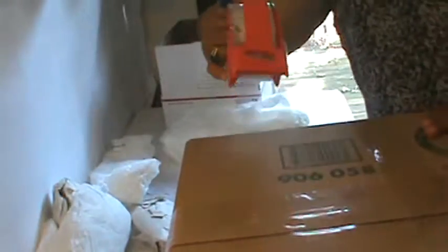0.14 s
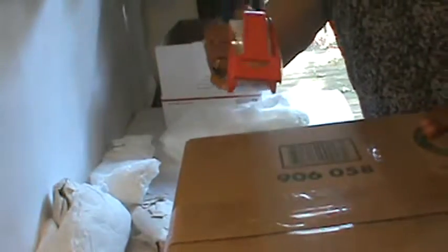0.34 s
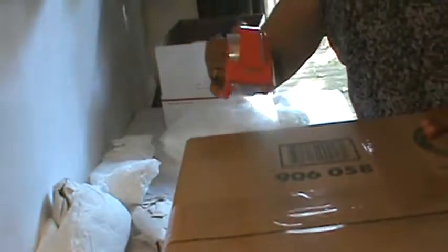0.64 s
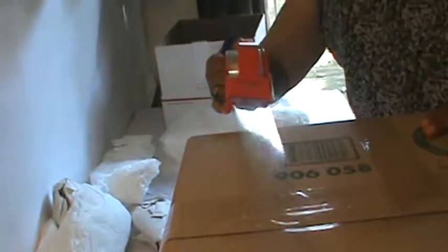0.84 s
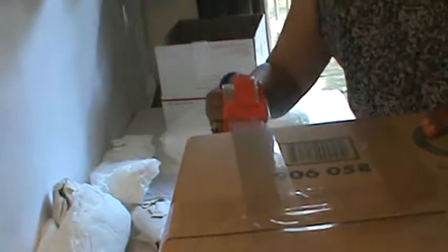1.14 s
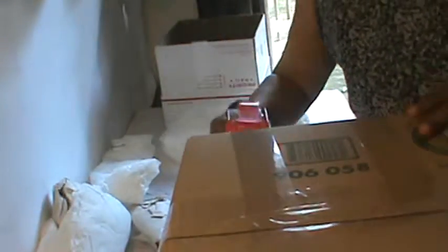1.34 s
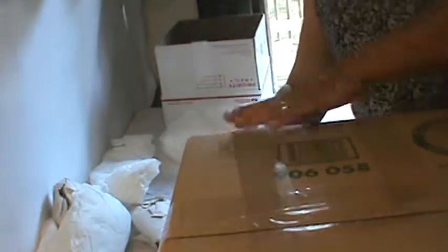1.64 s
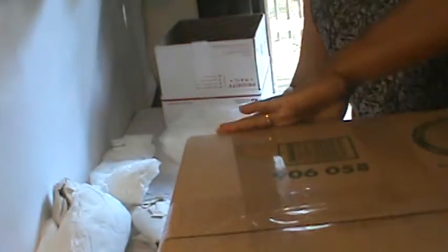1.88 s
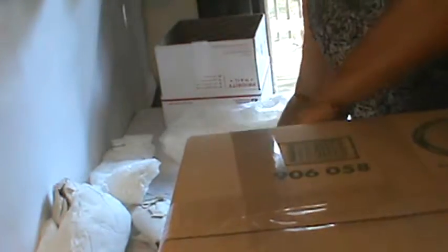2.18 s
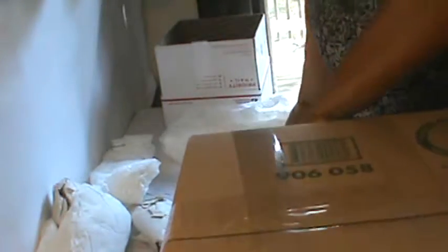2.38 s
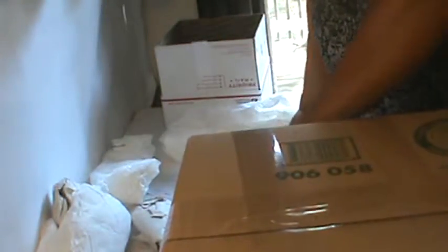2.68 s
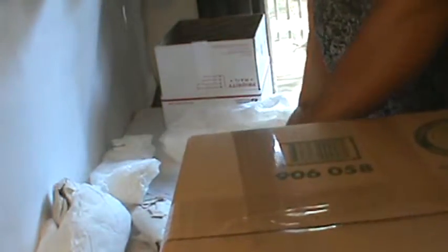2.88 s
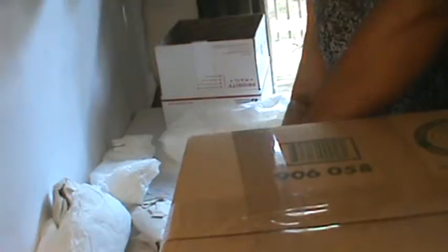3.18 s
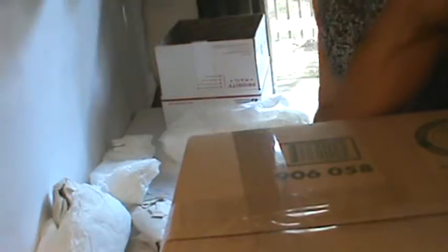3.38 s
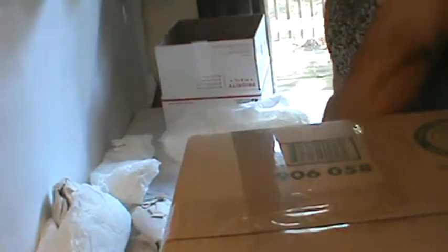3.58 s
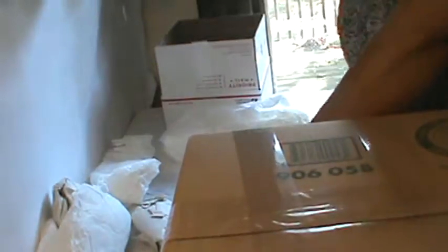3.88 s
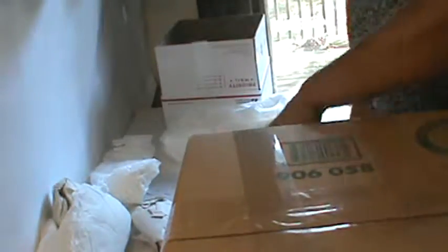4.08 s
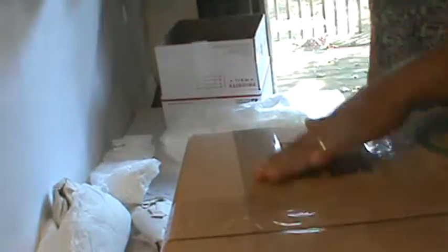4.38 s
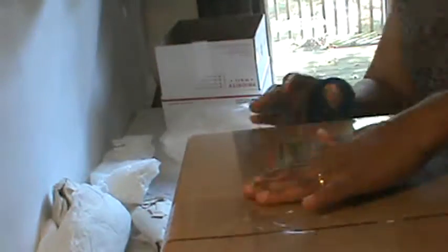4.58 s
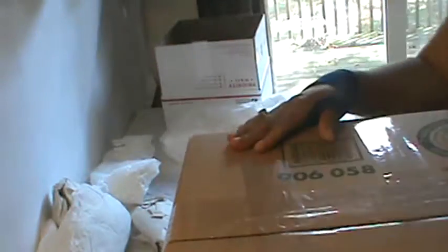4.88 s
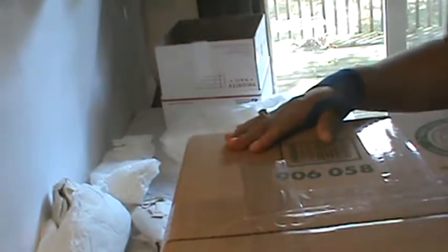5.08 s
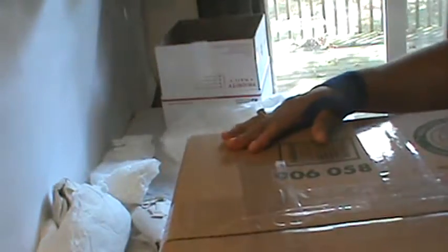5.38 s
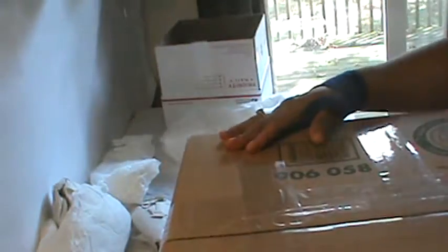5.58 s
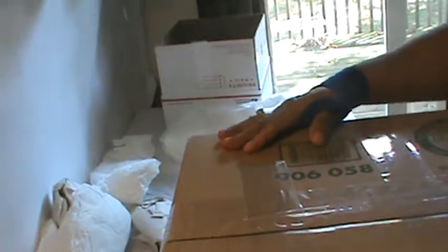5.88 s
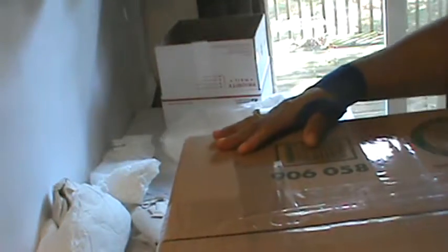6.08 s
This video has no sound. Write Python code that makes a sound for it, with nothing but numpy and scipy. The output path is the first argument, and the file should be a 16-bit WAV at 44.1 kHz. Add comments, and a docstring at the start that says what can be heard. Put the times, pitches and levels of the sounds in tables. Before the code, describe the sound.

Packing tape rasps off a hand-held dispenser in two harsh, crackling pulls, then hands pat and rub a hollow cardboard box indoors.

```python
"""A small furnished room: packing tape is drawn off a hand-held dispenser onto a hollow cardboard box.
The glue lets go in single snaps, each a click and a short noisy tear, that merge into a rasp.
Later, hands press and rub (grainy noise), knock (short pushes), and skin creaks in nearly even ticks.
Pushes ring the modes of the box; a dense fading tail makes the room, over a steady noise floor."""
import sys
import numpy as np
from scipy import signal
from scipy.fft import rfft, irfft
from scipy.io import wavfile

SR = 44100
rng = np.random.default_rng(int(sys.argv[2]) if len(sys.argv) > 2 else 0)


def dump(signal):
    """Clip the signal to [-1, 1] and save it as 16-bit WAV at the path in sys.argv[1]."""
    limited = np.clip(np.atleast_2d(signal).T, -1, 1)
    pcm = np.round(limited * 32767).astype(np.int16)
    wavfile.write(sys.argv[1], SR, pcm)


N = 275184

# Single releases of the glue from the roll, one (1.487 s) a fainter repeat close after a snap: start_s,
# level_db
GLUE_SNAPS = [(.0054, -12), (.0199, -10), (.0276, -10), (.0323, -14), (.037, -15), (.0442, -12),
              (.0574, -12), (.0648, -12), (.0714, -12), (.0788, -12), (.0912, -12), (.0972, -12),
              (.1094, -13), (.1163, -12), (.124, -12), (.1319, -13), (.1414, -13), (.1561, -12),
              (.1614, -12), (.1672, -13), (.1775, -12), (.1924, -13), (.203, -11), (.2078, -12),
              (.2221, -9), (.239, -10), (.2541, -10), (.3027, -10), (.3221, -11), (.3662, -9), (.3891, -11),
              (.4131, -10), (.4291, -12), (.4494, -10), (.4604, -11), (.4734, -11), (.4822, -11),
              (.4908, -10), (.5024, -12), (.5153, -11), (.5233, -11), (.5317, -12), (.5531, -9),
              (.5907, -9), (.6166, -11), (.6515, -10), (.8374, -12), (.9178, -11), (.9577, -9),
              (1.4807, -8), (1.487, -13), (1.5458, -8), (1.6294, -8), (1.6401, -15), (1.661, -9),
              (1.6829, -10), (1.6929, -14), (1.7045, -12), (1.7159, -14), (1.721, -14), (1.7365, -11),
              (1.7625, -11), (1.768, -12), (1.7793, -11), (1.7969, -11), (1.8056, -11), (1.8226, -12),
              (1.841, -12), (1.8646, -11), (1.8858, -12), (1.8981, -12), (1.9194, -11), (1.9463, -11),
              (1.9664, -11), (1.9927, -12), (2.0146, -13), (2.0209, -15), (2.0277, -14), (2.0462, -13),
              (2.0594, -15), (2.0736, -15), (2.0848, -16), (2.0942, -15), (2.1017, -15), (2.1088, -15),
              (2.1187, -15), (2.1322, -15), (2.144, -14), (2.1534, -15), (2.1717, -16), (2.1883, -16),
              (2.2044, -13)]
# How long a release lasts and how far its first click stands out: time_s, tear_ms, click_times_tear_peak
TEAR_SHAPE = [(0, 2.28, 0.32), (.7, 2.14, 0.58), (.84, 2.8, .7), (.92, 1.85, 0.72), (1.48, 1.5, 1.7),
              (1.63, 0.76, 0.88), (2.3, 0.33, 2)]
# The free tape's ringing, lower once it bends round the far edge: time_s, pitch_hz
FREE_TAPE_PITCH = [(0, 10660), (.7, 10700), (.83, 9870), (1.71, 10000), (1.74, 6300), (2.3, 6560)]
# Fine peeling between the snaps: time_s, level_db
FINE_PEELING = [(0, -26.5), (.1, -36), (.45, -37), (.55, -33), (.62, -34), (.7, -57), (1.48, -91.5),
                (1.482, -20.5), (1.5, -25.5), (1.506, -61), (1.545, -90), (1.547, -19.5), (1.562, -28.5),
                (1.568, -61), (1.62, -93), (1.635, -25.5), (1.75, -22), (1.85, -28), (2.05, -28),
                (2.15, -24), (2.21, -22), (2.25, -29), (2.3, -72.5)]
# How the tape hangs, stage by stage: start_s, to_slack_tape_db, to_box_db, to_taut_tape_db, taut_pitch_hz
TAPE_STAGES = [(0, -12, -61.5, -8, 2660), (.09, -12, -59, 0.5, 2860), (.19, -13, -54.5, 5, 2700),
               (.29, -4, -57, -2.5, 2500), (.315, -11, -55.5, 0, 1990), (.36, -2, -60, 2.5, 2900),
               (.385, -9, -51.5, 0, 3840), (.445, -7, -52.5, -3.5, 2490), (.51, -3.5, -54, 0, 3480),
               (.58, -2, -64, -8, 3130), (.8, -4.5, -48, 2, 3130), (.9, -7, -53, -6, 3060),
               (1.2, -7, -49, -6, 2300), (1.62, -8, -45, -1.5, 2500), (1.73, -7, -45.5, -5, 2860),
               (1.82, -11, -46, -11.5, 3490), (2.1, -11, -44.5, -4, 3590)]
# Tone of tape drawn in the air above the box: frequency_hz, level_db (per Hz)
TONE_ABOVE_BOX = [(60, -52), (90, -24.5), (118, 1.5), (170, -2.5), (250, -4.5), (330, -0.5), (420, -14.5),
                  (800, -2.5), (1100, -1.5), (1700, 1), (2400, 0.5), (3600, 0.5), (5300, 0.5), (8500, -2),
                  (10500, -1.5), (12500, -2), (15200, -9.5), (16500, -17)]
# Tone of tape drawn down behind the far edge: frequency_hz, level_db (per Hz)
TONE_BEHIND_EDGE = [(110, -33.5), (172, 4.5), (215, -15), (300, -7.5), (427, 8), (472, -2.5), (577, -1.5),
                    (730, -14), (1250, 1), (2240, -1.5), (10100, 0), (15200, -11.5), (16500, -31)]
# Resonances of the slack tape, each passed twice: frequency_hz, width_hz (one pass), level_db
SLACK_MODES = [(601, 248, 6), (874, 222, 7.5)]
# Panel and air modes of the box: frequency_hz, level_db, fade_by_60_db_s
BOX_MODES = [(79, -18.5, 0.065), (110.6, -13, 0.28), (171, 5, 0.084), (242.6, 1.5, 0.087),
             (273, 2.5, 0.026), (350.3, -8, 0.15), (428, 4.5, 0.041), (515, 0.5, 0.049),
             (770, -10.5, 0.075), (990, -6, 0.017)]
# Soft noise of hands brushing and pressing the box, and the dying tail of the pulled tape at 2.29 s:
# start_s, rise_s, hold_s, hiss_db, scrape_db, rumble_db
SOFT_SWELLS = [(1.279, 0.0041, 0.046, -57.5, -59.5, -64), (2.294, 0.03, 0.052, -51.5, -68, -84),
               (2.368, 0.025, 4.2, -74, -70.5, -67), (2.407, 0.033, 0.042, -63, -67, -71),
               (2.622, 0.019, 0.016, -85.5, -74.5, -91.5), (2.823, 0.017, 0.0079, -67, -81, -62),
               (2.935, 0.06, .03, -83, -63.5, -61), (3.035, 0.00099, 0.016, -42, -56, -51),
               (3.107, 0.0025, 0.041, -36, -39, -51), (3.111, 0.035, 0.0063, -24.5, -34.5, -50),
               (3.26, 0.084, 0.28, -55.5, -71.5, -70), (3.502, 0.1, 0.051, -55.5, -55, -56),
               (3.63, 0.058, 0.027, -49, -55, -65), (3.971, 0.0062, 0.0022, -48, -40.5, -31),
               (4.119, 0.017, 0.0045, -46.5, -39, -36), (4.665, 0.0054, 0.067, -62, -52.5, -49),
               (4.775, 0.018, 0.12, -55, -49, -65), (5.578, .03, 0.23, -60, -62, -60),
               (4.401, 0.0018, 0.0026, -56, -48, -32), (4.402, 0.0032, 0.066, -43, -58, -87)]
# Both hands smoothing the tape over the top: time_s, hiss_db
TOP_SMOOTHING = [(4.5, -59), (4.572, -58.5), (4.652, -39), (4.69, -41.5), (4.77, -36), (4.785, -24),
                 (4.838, -21), (4.92, -19), (4.976, -31), (5.034, -31), (5.082, -42), (5.38, -51),
                 (5.43, -42.5), (5.49, -42), (5.624, -28), (5.754, -24.5), (5.88, -34), (5.962, -28),
                 (6.068, -35.5), (6.2, -35.5), (6.22, -40), (6.24, -30)]
# Tone of the hiss, as of skin on film, on the far side panel: frequency_hz, level_db (per Hz)
SIDE_HISS_TONE = [(1760, -65), (3000, -4.5), (3390, -8), (4840, -6), (6530, 1.5), (7580, -5), (9530, 2.5),
                  (15100, -13.5), (16200, -26), (16500, -46)]
# Tone of skin hissing on film, on the top: frequency_hz, level_db (per Hz)
TOP_HISS_TONE = [(1760, -29), (3000, -13.5), (3930, -12), (4700, -11), (7160, -3), (8810, -4.5),
                 (11600, -1.5), (15700, -14), (16200, -17), (16500, -29)]
# Tone of the scrape, as of skin on cardboard, on the far side panel: frequency_hz, level_db (per Hz)
SIDE_SCRAPE_TONE = [(290, -24), (500, -6.5), (736, 14.5), (996, -3), (1120, 2.5), (1880, -1), (2300, 4.5),
                    (3320, -4.5), (4500, -4), (5850, -27), (9900, -120)]
# Tone of skin scraping cardboard, on the top: frequency_hz, level_db (per Hz)
TOP_SCRAPE_TONE = [(290, -77.5), (450, -5), (750, -3), (1150, -4.5), (1760, -1), (2300, -3), (2900, -6.5),
                   (3740, -5.5), (4500, -13), (5850, -84), (9900, -120)]
# Resonances of the rubbed side panel, each passed twice: frequency_hz, width_hz (one pass), level_db
SIDE_PANEL_MODES = [(510, 130, 8), (1030, 170, 11), (1385, 120, 11), (1870, 200, 10), (3400, 400, 5)]
# Tone of the box shaken by rubbing: frequency_hz, level_db (per Hz)
RUMBLE_TONE = [(15, -31), (25, -12), (59, 1.5), (108, -2.5), (165, 7), (281, -3.5), (325, 2.5), (382, -4),
               (436, -1), (600, -9), (780, -34), (1320, -120)]
# Lone crackles of the laid tape: start_s, level_db, pitch_hz
LONE_CRACKLES = [(1.281, -38, 6500), (1.3149, -44, 5000), (2.8404, -48, 9600), (2.862, -57, 5000),
                 (3.035, -31, 6500), (3.1064, -33, 6500), (3.3842, -34, 6500), (3.54, -39, 5000),
                 (3.6494, -32, 6500), (3.6676, -37, 6500), (3.9784, -31, 6960), (4.1355, -29.5, 6500),
                 (4.175, -44, 9000), (4.21, -49, 2800), (4.2607, -41, 9000), (4.31, -48, 5000),
                 (4.4019, -35, 6500), (4.656, -30, 3000), (4.678, -26, 2000), (4.7244, -14, 4230),
                 (4.7424, -16, 3200), (4.78, -24, 3500), (4.8017, -14, 4000)]
# Skin creaking in short, nearly even runs of ticks: start_s, end_s, rate_per_s, level_db, pitch_hz
SKIN_TICK_RUNS = [(2.4365, 2.505, 92.5, -39, 5500), (2.9607, 3.02, 75.5, -41, 5500)]
# Tone of crackles and creak ticks: frequency_hz, level_db (per Hz)
TICK_TONE = [(400, -39), (1200, -12), (3000, -10), (4000, -5), (9000, -4), (15500, -15.5), (16500, -19)]
# Hands landing on the box: start_s, level_db, favoured_pitch_hz
HAND_KNOCKS = [(1.318, -67, 293), (2.78, -53.5, 197), (2.838, -47, 299), (2.98, -52, 168),
               (3.038, -46, 406), (3.128, -36, 520), (3.151, -36, 1010), (3.158, -36, 171),
               (3.166, -33, 320), (3.976, -19.5, 330), (3.978, -21.5, 784), (3.993, -26, 223),
               (4.108, -35, 370), (4.137, -52, 500), (4.216, -40, 295), (4.402, -25, 146),
               (4.424, -25, 74.5), (4.45, -38, 70), (4.537, -48, 250), (4.679, -40.5, 205),
               (4.696, -35, 109), (4.716, -36, 109), (4.76, -35, 300), (4.799, -43, 400),
               (4.827, -37.5, 425), (5.161, -45.5, 346), (5.598, -38.5, 440), (5.69, -39, 400),
               (5.73, -40, 302), (5.755, -35.5, 410), (5.781, -44, 191), (6.05, -45, 171)]
# Skin sticking and slipping on the tape: start_s, end_s, first_rate_per_s, last_rate_per_s, tick_db, box_db
SKIN_CREAKS = [(2.636, 2.68, 168, 172, -56.5, -60), (3.5583, 3.643, 160, 182, -38.5, -50)]
# Tone of the steady floor: frequency_hz, level_db (per Hz)
FLOOR_TONE = [(15, -40.5), (25, -17), (85, 1.5), (146, -3.5), (252, -10), (927, -15), (1430, -22.5),
              (1550, -22), (14000, -27), (15200, -24), (16500, -18.5)]
# Basic stereo spread: frequency_hz, side_minus_mid_db
STEREO_SPREAD = [(60, -29.5), (180, -16.5), (550, -9), (1650, -10.5), (4970, -8.5), (15000, -6.5)]
# Stereo balance of everything sent through the room: frequency_hz, left_minus_right_db
ROOM_BALANCE = [(60, -2), (240, 1), (950, 1.5), (3770, 1), (15000, -1.5)]
# Room level against direct sound, changing as the source moves: time_s, room_level_db
ROOM_LEVEL = [(0, -3.5), (.7, -1.5), (.8, 5.5), (1.1, -3.5), (1.3, -0.5), (2.3, 1.5), (2.4, -7), (4.4, 1.5),
              (4.6, -7)]

BEHIND_EDGE_S, ONTO_TOP_S = 1.2, 4.4  # tape goes behind the edge; hands move from side panel to top
RING_SPREAD_OCTAVES = .04  # from one release to the next
SNAP_THIN_HZ = 1740  # a snap is too small to send out much below this
SLACK_LAG_S = .005  # the slack tape answers a moment after the snap
TAUT_WIDTH_HZ = 250  # first mode, one pass
TAUT_OVERTONE, TAUT_OVERTONE_DB = 1.938, -2  # second mode: times the first, and level
RISE_DB, FALL_DB_PER_S = 39, 284  # a swell climbs this far, then falls this fast
SMOOTH_MID_DB, SCRAPE_DB, RUMBLE_DB = -30, -45, -52  # middling hiss; scrape and rumble at that point
SCRAPE_FOLLOWS, RUMBLE_FOLLOWS = 0.69, 0.53  # share of the hiss's swing in dB
SIDE_PAN_DB, TOP_PAN_DB = .7, -2  # hiss, left minus right
FLOOR_DB = -61.5
ROOM_T60_S, BASS_T60_S, ROOM_GAP_S = 0.2, 0.32, 0.0017  # fade by 60 dB; moment the reflections build up
CUTOFF_HZ = 15850


def from_db(db):
    """Turn decibels into gain."""
    return 10 ** (np.asarray(db) / 20)


def rms_one(x):
    """Scale to an average strength (rms) of 1."""
    return x / np.sqrt(np.mean(x ** 2) + 1e-20)


def in_time(rows):
    """Join table columns by straight lines, one value a sample."""
    s, *columns = np.transpose(rows)
    return [np.interp(np.arange(N) / SR, s, column) for column in columns]


def add(track, s, sound):
    """Mix a short sound in at time s."""
    i = round(s * SR)
    track[i:i + len(sound)] += sound[:N - i]


def colour(x, spectrum):
    """Shape the tone with a filter that answers as early as it can (minimum phase)."""
    hz, db = np.transpose(spectrum)
    grid_hz = np.maximum(np.arange(4097) * SR / 8192, 1)
    log_gain = np.interp(np.log(grid_hz), np.log(hz), db) * np.log(10) / 20
    # folding the cepstrum onto positive times gives the minimum phase
    cepstrum = irfft(log_gain)
    cepstrum[1:4096] *= 2
    cepstrum[4097:] = 0
    response = irfft(np.exp(rfft(cepstrum)))
    return signal.fftconvolve(x, response)[:N]


def resonate(x, hz, width_hz):
    """Ring at one pitch (two-pole resonance), with gain 1 at its peak."""
    r = np.exp(-np.pi * width_hz / SR)
    top = np.array([1, 0, -1]) * (1 - r * r) / 2
    return signal.lfilter(top, [1, -2 * r * np.cos(2 * np.pi * hz / SR), r * r], x + 1e-18)


def resonate_twice(x, hz, width_hz):
    """Pass through the same resonance twice, for steeper sides."""
    return resonate(resonate(x, hz, width_hz), hz, width_hz)


def grains(per_s, spread_db):
    """Dense random micro-slips of uneven size; rms 1."""
    sizes = from_db(spread_db * np.minimum(rng.exponential(1, N), 5)) * rng.choice([-1, 1], N)
    return rms_one(sizes * (rng.random(N) < per_s / SR))


def wide_noise(spectrum, per_s, spread_db):
    """Grainy noise: a mid part of rms 1 plus an unrelated side part, opposite in left and right."""
    mid, side = (rms_one(colour(grains(per_s, spread_db), spectrum)) for _ in range(2))
    return mid + colour(side, STEREO_SPREAD) * [[1], [-1]]


def snaps(events, ring_db, half_db, width_hz):
    """A release is a sharp click and a moment of tearing; the tape rings at a pitch and an octave below."""
    out, t = np.zeros(N), np.arange(400) / SR
    bursts = rng.standard_normal((len(events), 400))
    for (s, level_db, hz, tear_ms, click), burst in zip(events, bursts):
        shape = np.exp(-(1000 * t / tear_ms) ** 1.5)
        # a tear holds most pitches: partly flatten its spectrum inside its outline
        for _ in range(2):
            phase = np.angle(rfft(rms_one(burst) * shape))
            burst = irfft(np.exp(1j * phase)) * np.sqrt(shape)
        burst[0] = click * np.max(np.abs(burst))
        burst = burst + from_db(ring_db) * resonate(burst, hz, width_hz)
        # this also answers the ringing just added
        burst = burst + from_db(half_db) * resonate(burst, hz / 2, width_hz / 2)
        start_strength = np.sqrt(np.mean(burst[:40] ** 2))
        add(out, s, from_db(level_db) * burst / start_strength)
    return out


def taut_tape(force, stage, pitches):
    """The stretched span rings in two modes whose pitch shifts whenever the span changes."""
    out = 0
    for k, hz in enumerate(pitches):
        stage_force = force * (stage == k)
        for times, level_db in ((1, 0), (TAUT_OVERTONE, TAUT_OVERTONE_DB)):
            out = out + from_db(level_db) * resonate_twice(stage_force, times * hz, times * TAUT_WIDTH_HZ)
    return out


def slack_tape(force):
    """The loose tape answers a little late, in broad low resonances of alternating sign."""
    shake = np.roll(force, round(SLACK_LAG_S * SR))
    out = 0
    for k, (hz, width_hz, level_db) in enumerate(SLACK_MODES):
        out = out + (-1) ** k * from_db(level_db) * resonate_twice(shake, hz, width_hz)
    return out


def tape():
    """Snaps and fine peeling shake the slack and taut tape; also returns the force passed to the box."""
    peel_db, = in_time(FINE_PEELING)
    tear_ms, click = in_time(TEAR_SHAPE)
    ring_hz, = in_time(FREE_TAPE_PITCH)
    starts, *shares, taut_hz = np.transpose(TAPE_STAGES)
    stage = np.clip(np.searchsorted(starts, np.arange(N) / SR) - 1, 0, None)
    slack_db, box_db, taut_db = (share[stage] for share in shares)

    detune = 2 ** (RING_SPREAD_OCTAVES * rng.standard_normal(len(GLUE_SNAPS)))
    events = []
    for (s, level_db), factor in zip(GLUE_SNAPS, detune):
        i = round(s * SR)
        events.append((s, level_db, min(factor * ring_hz[i], .4 * SR), tear_ms[i], click[i]))
    snap = snaps(events, ring_db=-0.5, half_db=-7.5, width_hz=920)
    peel = from_db(peel_db) * grains(3500, spread_db=3.5)
    force = snap + peel
    thin = signal.lfilter(*signal.butter(1, SNAP_THIN_HZ, "high", fs=SR), snap) + peel

    behind = np.arange(N) > BEHIND_EDGE_S * SR
    air = from_db(1.5) * colour(thin * ~behind, TONE_ABOVE_BOX)
    air = air + from_db(1.75) * colour(thin * behind, TONE_BEHIND_EDGE)
    slack = slack_tape(force * from_db(slack_db))
    taut = taut_tape(force * from_db(taut_db), stage, taut_hz)
    return air + slack + taut, force * from_db(box_db)


def box(force):
    """The hollow box rings in its panel and air modes, with little left below about 70 Hz."""
    out = 0
    for k, (hz, level_db, t60_s) in enumerate(BOX_MODES):
        r, w = from_db(-60 / (t60_s * SR)), 2 * np.pi * hz / SR
        ringing = signal.lfilter([0, np.sin(w)], [1, -2 * r * np.cos(w), r * r], force + 1e-18)
        out = out + (-1) ** k * from_db(level_db) * ringing
    return signal.sosfilt(signal.butter(2, 70, "high", fs=SR, output="sos"), out)


def steady_floor():
    """An even bed of very dense grainy noise lies under everything."""
    return from_db(FLOOR_DB) * wide_noise(FLOOR_TONE, 22000, spread_db=-2.5)


def soft_noise_gains():
    """Hiss, scrape and rumble gains: swells rise, hold and die away; the smoothing drives all three."""
    t = np.arange(N) / SR
    hiss_db, = in_time(TOP_SMOOTHING)
    swing_db = hiss_db - SMOOTH_MID_DB
    scrape_db = SCRAPE_DB + SCRAPE_FOLLOWS * swing_db
    rumble_db = RUMBLE_DB + RUMBLE_FOLLOWS * swing_db
    gains = from_db([hiss_db, scrape_db, rumble_db]) * (t > TOP_SMOOTHING[0][0])
    for s, rise, hold, *levels_db in SOFT_SWELLS:
        swell_db = RISE_DB * np.minimum((t - s) / rise - 1, 0)
        fall_db = FALL_DB_PER_S * (s + rise + hold - t)
        shape_db = np.maximum(np.minimum(swell_db, fall_db), -200)
        gains = gains + from_db(levels_db)[:, None] * (from_db(shape_db) * (t >= s))
    return gains


def rubbing_and_tape_tail():
    """Skin on film hisses, on cardboard scrapes, and shakes the box; the pulled tape's tail is noise too."""
    hiss_gain, scrape_gain, rumble_gain = soft_noise_gains()
    on_top = np.arange(N) > ONTO_TOP_S * SR
    pan_db = np.where(on_top, TOP_PAN_DB, SIDE_PAN_DB)
    pan = from_db(pan_db / 2 * [[1], [-1]])

    top_hiss = wide_noise(TOP_HISS_TONE, 14000, spread_db=2.0)
    side_hiss = wide_noise(SIDE_HISS_TONE, 9000, spread_db=2.5)
    hiss = np.where(on_top, top_hiss, side_hiss)

    side_scrape = wide_noise(SIDE_SCRAPE_TONE, 2500, spread_db=1.0)
    panel = sum(from_db(db) * resonate_twice(side_scrape, hz, width) for hz, width, db in SIDE_PANEL_MODES)
    side_scrape = rms_one(side_scrape + panel)
    top_scrape = wide_noise(TOP_SCRAPE_TONE, 4000, spread_db=0.5)
    scrape = np.where(on_top, top_scrape, side_scrape)

    rumble = wide_noise(RUMBLE_TONE, 1500, spread_db=0.5)
    return hiss_gain * pan * hiss + scrape_gain * scrape + rumble_gain * rumble


def runs(rows, uneven, spread_db):
    """Spell runs out as single (s, dB, Hz) events, a little uneven in time and size."""
    out = []
    for start, end, per_s, level_db, hz in rows:
        times = np.arange(start, end, 1 / per_s)
        for s, (shift, size) in zip(times, rng.standard_normal((len(times), 2))):
            out.append((max(s + uneven * shift / per_s, 0), level_db + spread_db * size, hz))
    return out


def crackles():
    """The laid tape gives lone very short releases, and skin creaks in short, nearly even runs of ticks; each
    also nudges the box."""
    ticks = LONE_CRACKLES + runs(SKIN_TICK_RUNS, uneven=0.052, spread_db=0.77)
    events = [(s, level_db, hz, .15, 2) for s, level_db, hz in ticks]  # .15 ms tear, click twice its peak
    force = snaps(events, ring_db=3.5, half_db=-10.0, width_hz=1400)
    return colour(force, TICK_TONE), from_db(-55) * force


def knocks():
    """A palm lands within a millisecond or so; where and how hard it lands favours some modes."""
    force, t = np.zeros(N), np.arange(1600) / SR
    roughness = rng.standard_normal((len(HAND_KNOCKS), 1600))
    for (s, level_db, hz), rough in zip(HAND_KNOCKS, roughness):
        contact = (1 + 0.22 * rough) * np.exp(-t / 0.00019)
        push = resonate(contact / np.sum(contact), hz, 0.25 * hz)
        add(force, s, from_db(level_db) * push)
    return force


def creaks():
    """Skin sticks and slips at a nearly regular rate: a thin tick each, and a soft push on the box."""
    ticks, push = [], np.zeros(N)
    for start, end, first, last, tick_db, box_db in SKIN_CREAKS:
        count = round((end - start) * (first + last) / 2)
        times = start + np.cumsum(1 / np.linspace(first, last, count)) - 1 / first
        for s, size in zip(times, rng.standard_normal(count)):
            ticks.append((s, tick_db + 3 * size, 6000, .15, 2))  # 6000 Hz, .15 ms tear, click twice its peak
            push[round(s * SR)] += from_db(box_db)
    soft_push = signal.lfilter(*signal.butter(2, [140, 330], "band", fs=SR), push)
    thin_ticks = snaps(ticks, ring_db=-4.5, half_db=-15, width_hz=2300)
    return colour(thin_ticks, TICK_TONE), soft_push


def room(x):
    """Direct sound plus a dense tail, longer in the bass; six reflection patterns stand for moving hands."""
    t = np.arange(SR // 2) / SR
    noise = rng.standard_normal((6, 2, len(t)))  # six patterns, mid and side
    bass = signal.lfilter(*signal.butter(1, 500, fs=SR), noise)
    tails = (noise - bass) * from_db(-60 * t / ROOM_T60_S) + bass * from_db(-60 * t / BASS_T60_S)
    tails *= np.clip(t / ROOM_GAP_S, 0, 1) ** 2  # first reflections need a moment to arrive
    tails /= np.sqrt(np.sum(tails[0, 0] ** 2))

    place = np.arange(N) // (SR // 25) % len(tails)  # the patterns take turns, about 25 a second
    room_db, = in_time(ROOM_LEVEL)
    sent = x * from_db(room_db)
    echoes = 0
    for k, tail in enumerate(tails):
        echoes = echoes + signal.fftconvolve((sent * (place == k))[None], tail, axes=1)[:, :N]
    mid, side = echoes
    left = colour(x + mid, [(hz, db / 2) for hz, db in ROOM_BALANCE])
    right = colour(x + mid, [(hz, -db / 2) for hz, db in ROOM_BALANCE])
    return np.array([left, right]) + from_db(2.5) * colour(side, STEREO_SPREAD) * [[1], [-1]]


def scene():
    """Bright sounds fill the room; forces on the box ring it close to the microphone; a floor lies below."""
    tape_sound, tape_force = tape()
    floor = steady_floor()
    soft_noise = rubbing_and_tape_tail()
    crackle_sound, crackle_force = crackles()
    knock_force = knocks()
    creak_sound, creak_force = creaks()

    bright = tape_sound + crackle_sound + creak_sound
    body = box(tape_force + crackle_force + knock_force + creak_force)
    return room(bright + from_db(-8.5) * body) + body + soft_noise + floor


def record(dry):
    """Peaks are softly rounded and the highest treble is cut."""
    rounded = 1.2 * np.tanh(dry / 1.2)
    return signal.sosfilt(signal.cheby2(14, 45, CUTOFF_HZ + 250, fs=SR, output="sos"), rounded)


dry = scene()
out = record(dry)
dump(out)
```